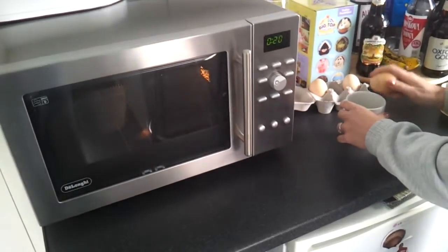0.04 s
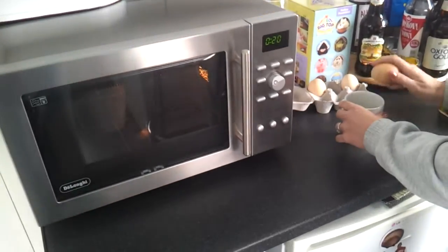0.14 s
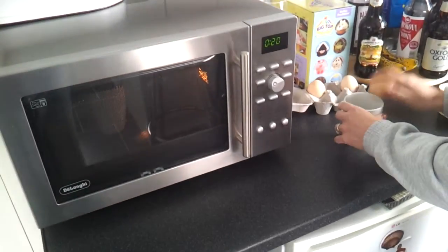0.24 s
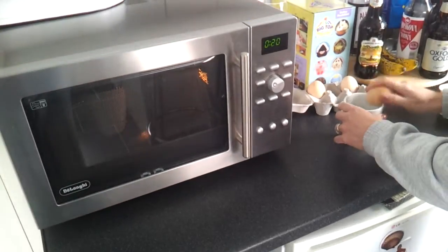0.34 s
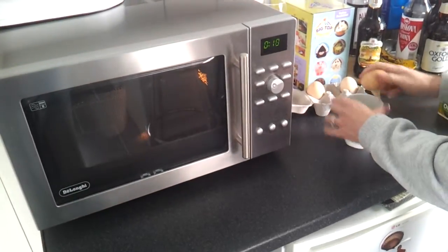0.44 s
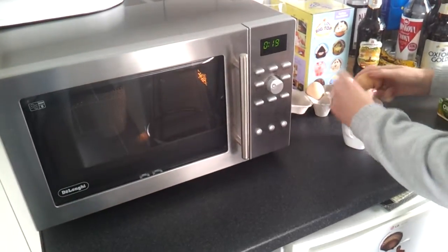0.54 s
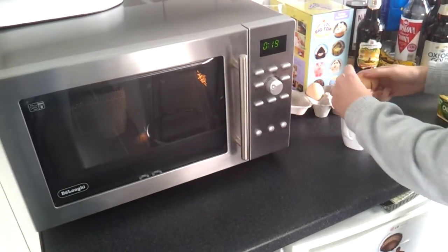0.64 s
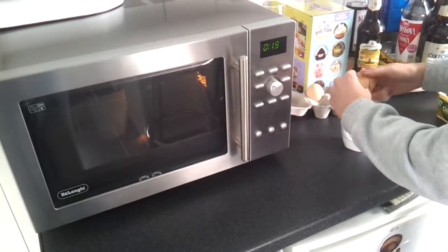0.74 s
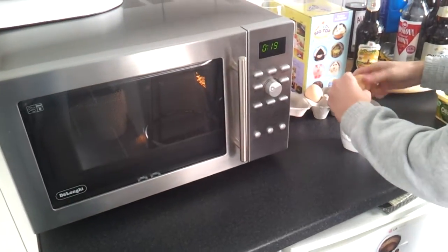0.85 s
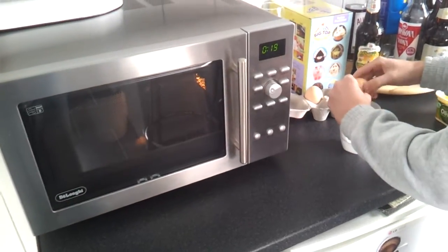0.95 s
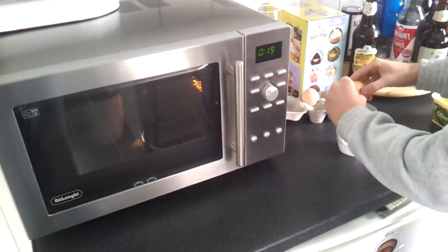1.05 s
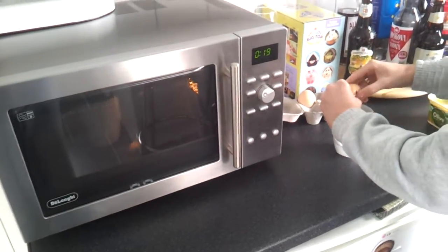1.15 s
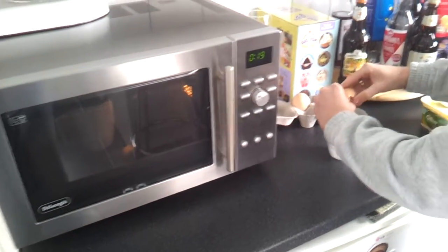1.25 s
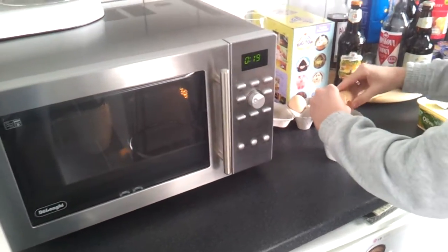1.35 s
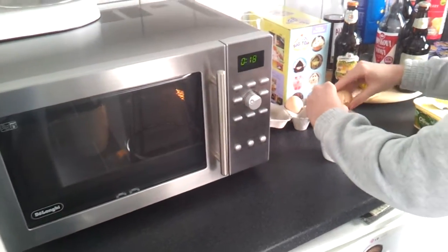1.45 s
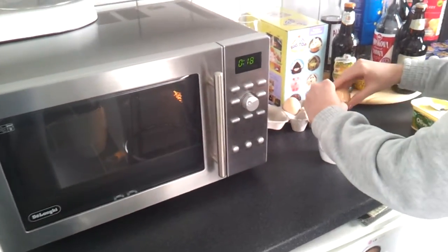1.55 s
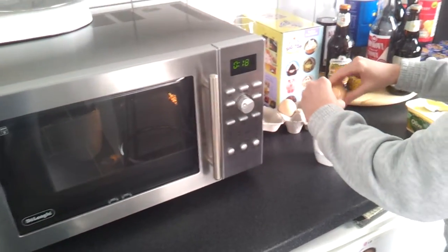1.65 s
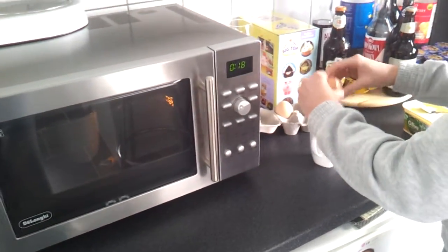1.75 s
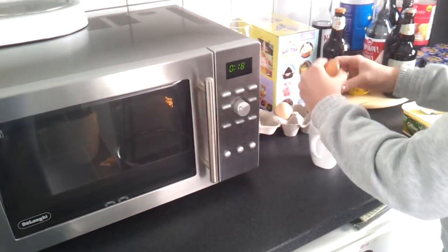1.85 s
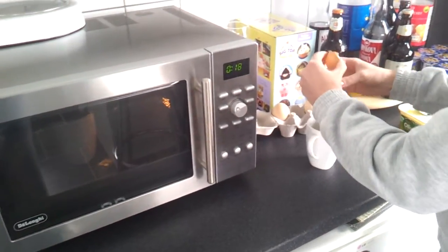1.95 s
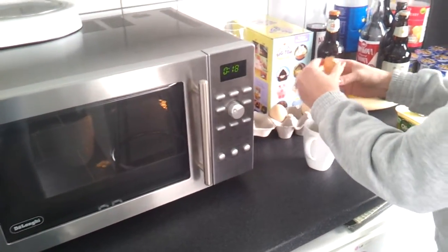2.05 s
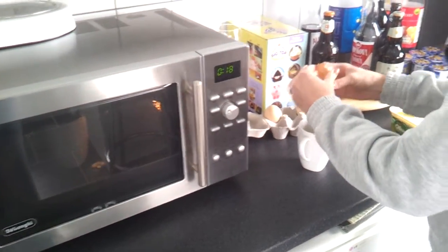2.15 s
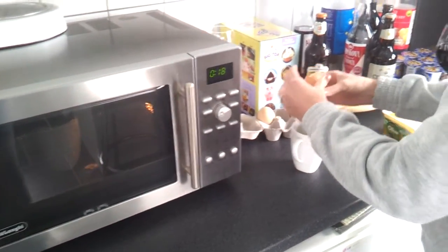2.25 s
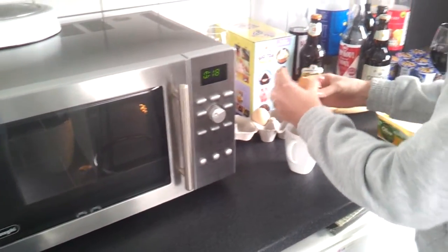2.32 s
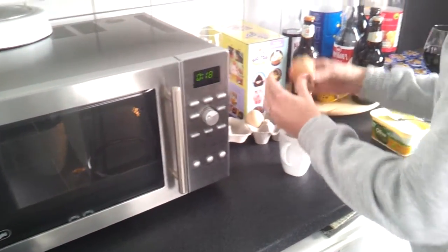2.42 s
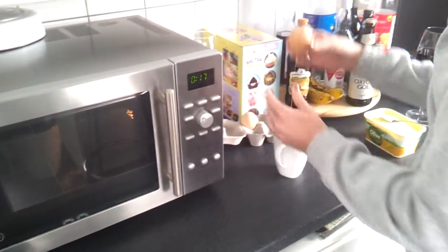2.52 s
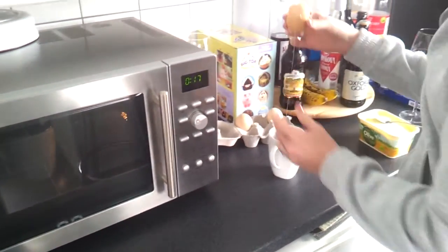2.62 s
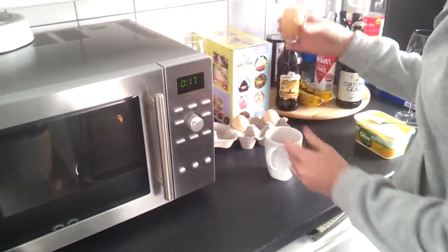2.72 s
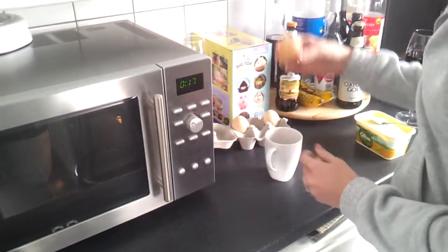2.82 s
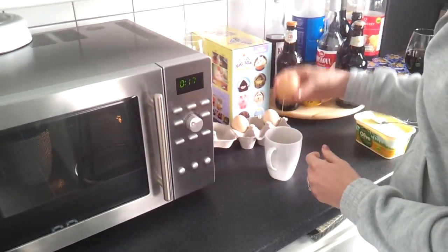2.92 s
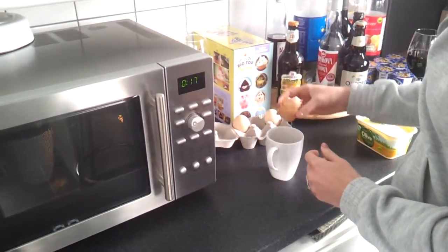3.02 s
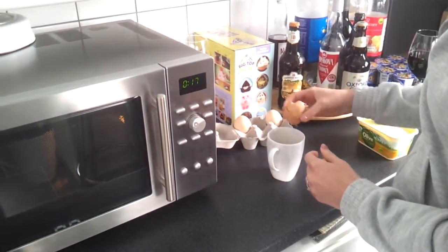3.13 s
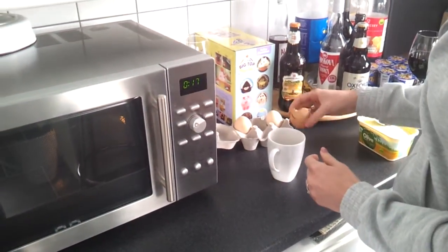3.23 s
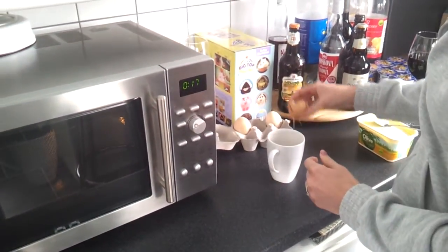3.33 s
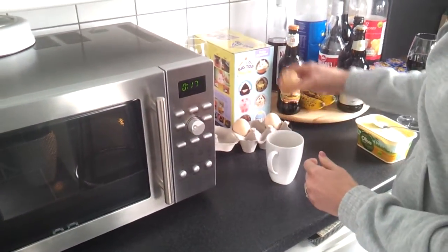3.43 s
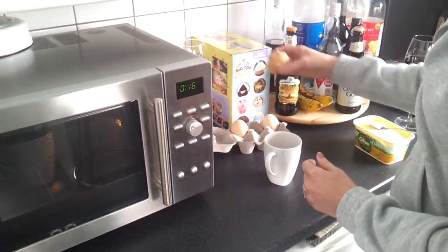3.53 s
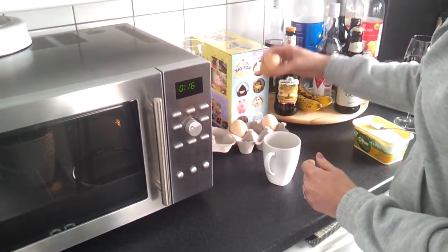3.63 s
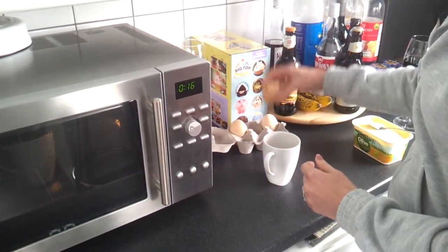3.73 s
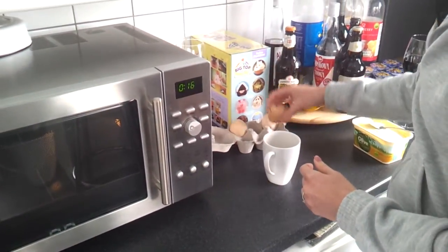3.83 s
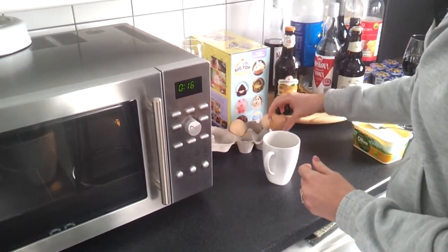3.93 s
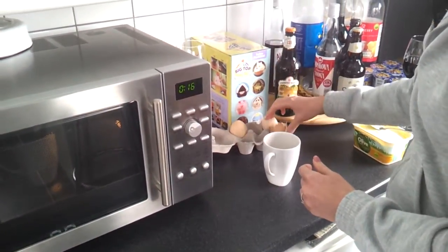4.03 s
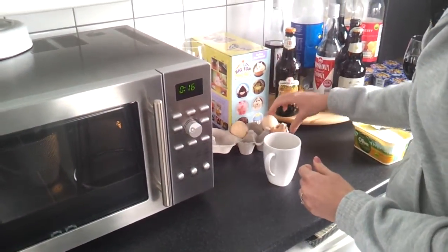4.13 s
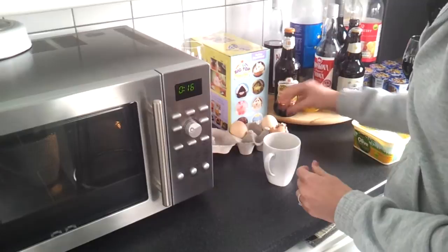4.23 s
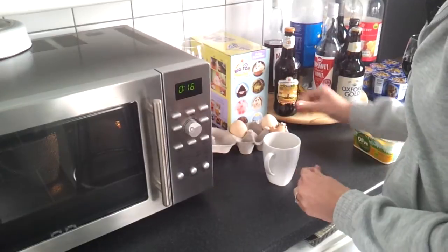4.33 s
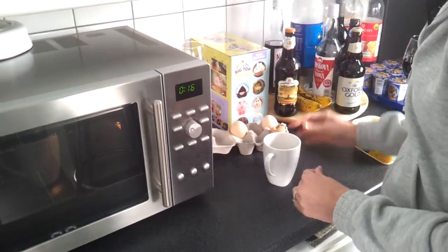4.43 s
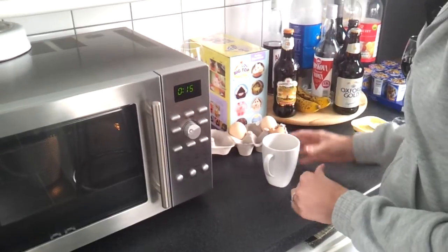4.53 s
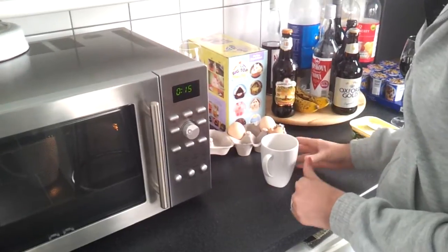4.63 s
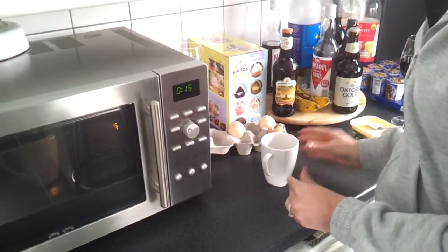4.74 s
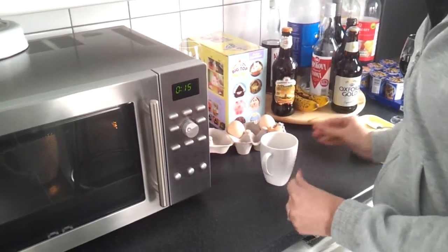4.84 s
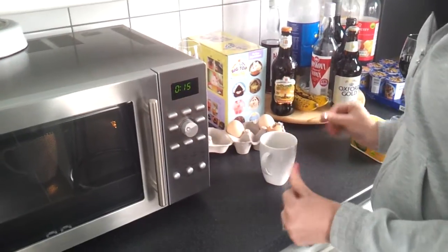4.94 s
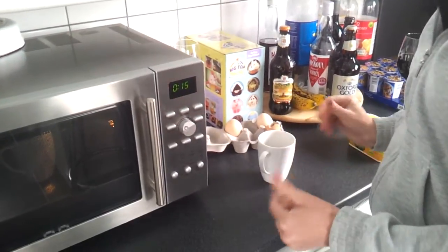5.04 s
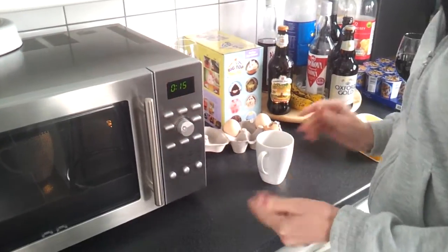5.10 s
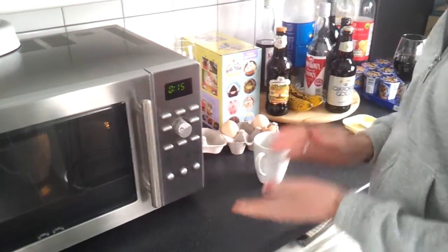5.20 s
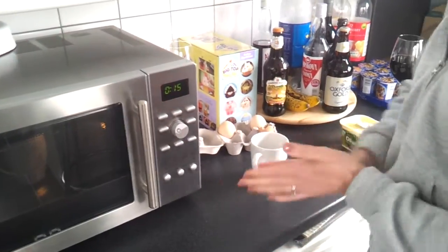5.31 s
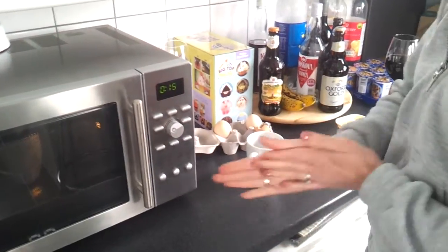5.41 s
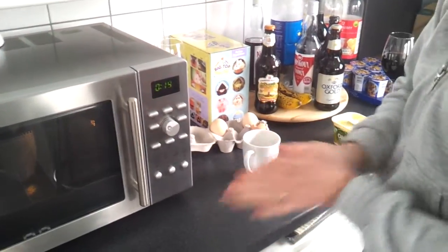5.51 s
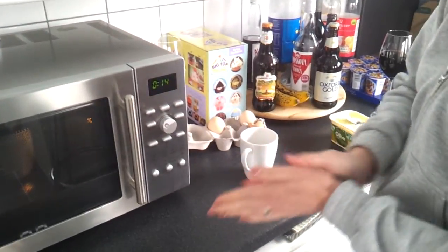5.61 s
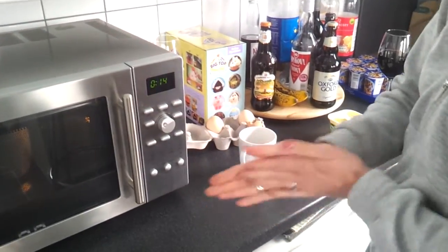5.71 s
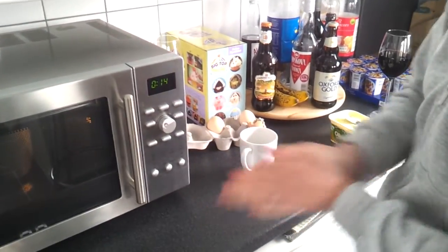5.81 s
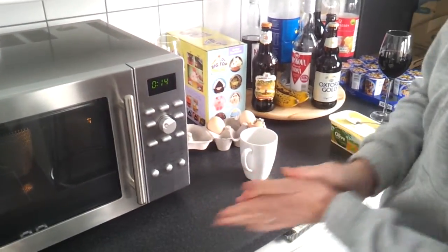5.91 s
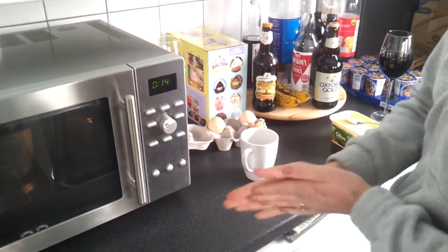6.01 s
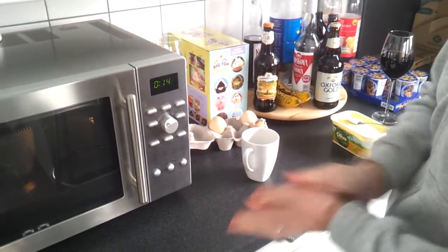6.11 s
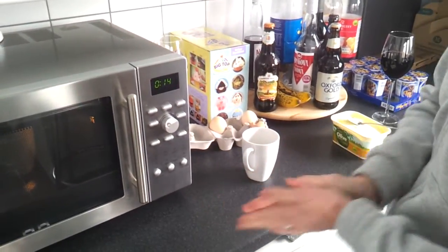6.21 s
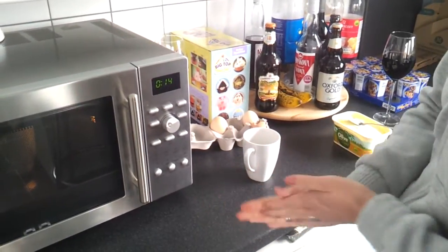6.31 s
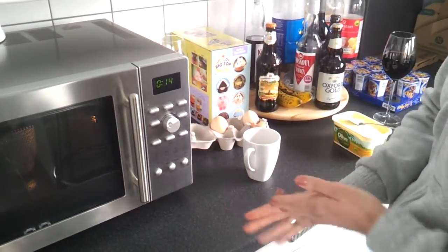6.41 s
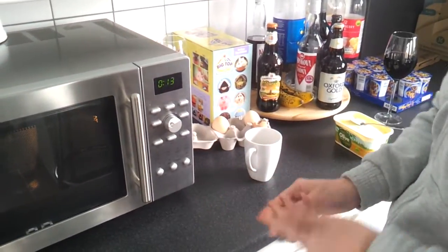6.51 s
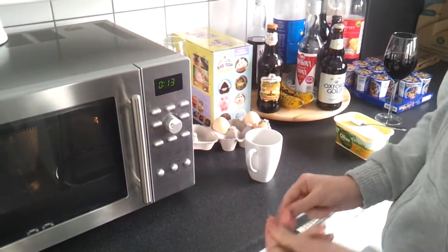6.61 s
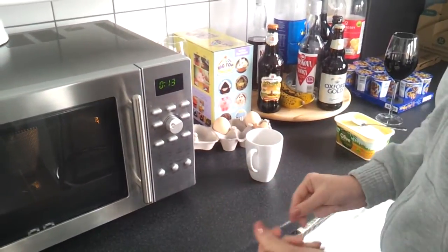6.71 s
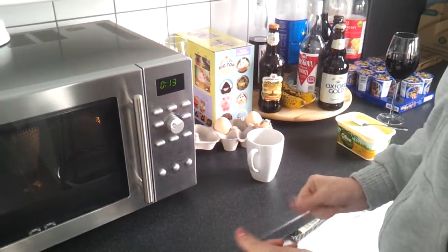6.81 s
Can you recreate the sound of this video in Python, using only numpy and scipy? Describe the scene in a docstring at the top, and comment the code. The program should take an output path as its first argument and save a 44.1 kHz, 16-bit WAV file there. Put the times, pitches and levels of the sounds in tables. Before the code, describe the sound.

Three quick knocks crack an egg beside a humming, blowing microwave oven, and a china cup rings faintly. Small crackles follow as the shell comes apart, with a second slight clink. After a few faint ticks the shell lands in its carton, then palms brush to and fro. The oven drones steadily the whole time, heard from beside the worktop in a small kitchen with a short echo.

```python
"""A small tiled kitchen, the microphone by the worktop. A microwave oven runs throughout: its fan drones
and blows, its transformer hums. Beside it an egg is knocked three times to crack it. The shell crackles as
it is pulled open over a china cup, which clinks twice, and is dropped into the carton; then two hands are
rubbed together. Tiles and cupboards close by ring after the handwork."""
import sys
import numpy as np
from scipy import signal
from scipy.fft import rfft, irfft, next_fast_len
from scipy.io import wavfile
from scipy.ndimage import uniform_filter1d

SR = 44100
rng = np.random.default_rng(int(sys.argv[2]) if len(sys.argv) > 2 else 0)


def file_out(sig):
    """Save sig as 16-bit WAV at sys.argv[1]."""
    # one column per channel
    cols = np.atleast_2d(sig).T
    # limit, then scale
    lim = np.clip(cols, -1, 1)
    pcm = np.round(lim * 32767).astype(np.int16)
    wavfile.write(sys.argv[1], SR, pcm)


N = 302526
TIME = np.arange(N) / SR
MAINS_HZ, TOP_HZ = 50, 8700
WANDER_PER_S = 1.488  # pace of the slow drifts in fan speed and hum level


def amp(db):
    """Decibels to gain."""
    return 10 ** (np.asarray(db) / 20)


def at_pitch(points, hz):
    """Read (f/Hz, value) points on a log-frequency axis."""
    f, value = np.transpose(points)
    return np.interp(np.log(np.maximum(hz, 1)), np.log(f), value)


def colour(x, points):
    """Causal filter with the given (f/Hz, level/dB) response."""
    n = next_fast_len(2 * len(x), True) // 2 * 2
    gain = amp(at_pitch(points, np.fft.rfftfreq(n, 1 / SR)))
    cepstrum = irfft(np.log(gain))
    cepstrum[1:n // 2] *= 2  # folded for minimum phase
    cepstrum[n // 2 + 1:] = 0
    return irfft(rfft(x, n) * np.exp(rfft(cepstrum)), n)[:len(x)]


def band(x, low_hz, high_hz, order=2):
    """Band-pass between two edges."""
    return signal.sosfilt(signal.butter(order, [low_hz, high_hz], "band", fs=SR, output="sos"), x)


def unit(x):
    """Scale to rms 1."""
    return x / np.sqrt(np.mean(x ** 2))


def walk(rate):
    """A smooth random drift of rms 1, with about `rate` new values a second."""
    hold = max(int(SR / rate), 1)
    steps = rng.standard_normal(N)[np.arange(N) // hold]
    return unit(uniform_filter1d(steps, hold))


def tone(phase, db):
    """A sine of the given rms level that starts anywhere in its cycle."""
    return np.sqrt(2) * amp(db) * np.sin(phase + 2 * np.pi * rng.random())


def fade(t60, size=SR // 4):
    """An exponential decay that loses 60 dB in t60 seconds."""
    return np.exp(-np.log(1000) * TIME[:size] / t60)


def rise(seconds, size=SR // 4):
    """An onset that climbs towards 1 with the given time constant."""
    return 1 - np.exp(-TIME[:size] / seconds)


def ring(modes, size=SR // 4):
    """A struck body's fading modes, with a peak of 1."""
    y = sum(amp(db) * fade(t60, size) * np.sin(2 * np.pi * hz * TIME[:size]) for hz, db, t60 in modes)
    return y / np.abs(y).max()


def burst(t60):
    """A crunch that starts at once and fades, even in spectrum so that it has no pitch."""
    spectrum = rfft(fade(t60) * rng.standard_normal(SR // 4))
    even = irfft(spectrum / np.abs(spectrum), SR // 4) * fade(2 * t60)
    return even * np.linalg.norm(fade(t60)) / np.linalg.norm(even)


def add(out, s, sound):
    """Mix a sound in at time s."""
    i = int(s * SR)
    out[i:i + len(sound)] += sound[:N - i]


# the fan's tones: multiple of the blade rate, level/dB, flutter/ratio to the steady part
BLADE_TONES = [(1, -47, 0.045), (2, -46.5, 0.094), (3, -59, 0.11), (5, -55, 1.4), (6, -65, .6),
               (7, -67.5, 0.83)]
def fan_drone(blade_phase, flutter_per_s=14):
    """The passing blades make harmonics; eddies push each about in strength and phase."""
    drone = 0
    for harmonic, db, flutter in BLADE_TONES:
        eddies = (walk(flutter_per_s) + 1j * walk(flutter_per_s)) / np.sqrt(2)
        wobble = (1 + flutter * eddies) / np.hypot(1, flutter)
        drone += np.abs(wobble) * tone(harmonic * blade_phase + np.angle(wobble), db)
    return drone


# the transformer's tones: multiple of the mains frequency, level/dB
HUM_TONES = [(2, -63.5), (4, -51.5), (6, -64.5), (8, -76), (12, -59), (14, -59.5)]
def transformer_hum(mains_phase):
    """The transformer hums on even harmonics of the mains."""
    return sum(tone(harmonic * mains_phase, db) for harmonic, db in HUM_TONES)


def motor_tones(shaft_phase, mains_phase):
    """The rotor modulates the magnetic pull: tones at the shaft rate and that far above two hum lines."""
    return sum(tone(k * mains_phase + shaft_phase, db) for k, db in [(0, -70), (4, -59), (2, -65)])


# the oven's whistles: f/Hz, level/dB
WHISTLES = [(6170, -70.5), (6540, -74.5), (6752, -73.5)]
def oven_whistles(trim_db=-1):
    """Faint high tones, each wavering in phase."""
    return sum(tone(2 * np.pi * hz * TIME + walk(7.6), db + trim_db) for hz, db in WHISTLES)


# spectrum of the air at the vents: f/Hz, level/dB per Hz
VENT_SPECTRUM = [(25, -93.5), (70, -88.5), (105, -75), (140, -74), (450, -71.5), (690, -72.5), (890, -74),
                 (980, -78.5), (1250, -78.5), (1680, -77), (1950, -81.5), (2700, -86), (4300, -87.5),
                 (6700, -89.5)]
def vent_air(trim_db=-1.24, swirl_db=0.31):
    """Air rushes through the vents, its level swaying slightly as it swirls."""
    white = rng.standard_normal(N) * np.sqrt(SR / 2)  # unit power per Hz
    return colour(white, VENT_SPECTRUM) * amp(trim_db + swirl_db * walk(8.3))


def oven(blade_hz=168.93, blades=4, speed_wander=0.00152, drone_db_per_s=0.31, hum_swell_db=1.6):
    """The oven on the worktop: fan and motor share one drifting shaft, the mains holds its pitch."""
    blade_rate = blade_hz * (1 + speed_wander * walk(WANDER_PER_S))
    blade_phase = 2 * np.pi * np.cumsum(blade_rate) / SR
    mains_phase = 2 * np.pi * MAINS_HZ * TIME
    drone = fan_drone(blade_phase)
    hum = transformer_hum(mains_phase)
    steady = motor_tones(blade_phase / blades, mains_phase) + oven_whistles() + vent_air()
    # the microphone moves slowly through the oven's sound: the drone grows, the hum swells and sinks
    drone *= amp(0.27 + drone_db_per_s * TIME)
    hum *= amp(-0.2 + hum_swell_db * walk(WANDER_PER_S))
    return drone + hum + steady


# spectrum of a crack in eggshell: f/Hz, level/dB
CRACK_SPECTRUM = [(300, -13.5), (1200, -13.5), (2000, -9.5), (2800, -5.5), (3600, -11), (4500, -2),
                  (5600, 0), (6800, -2.5), (8000, 4)]
# shell snaps, and at 1.58 s a short clink of the china cup near 2.6 kHz:
# t/s, level/dB, resonance f/Hz, relative resonance level/dB
SNAPS_AND_CLINK = [(.334, -12.5, 4800, -4.5), (0.3371, -11.5, 2900, -6), (0.9492, -33, 5630, -2),
                   (0.997, -36.5, 1640, 12), (1.066, -28, 3400, -9), (1.08, -30.5, 2250, 1),
                   (1.137, -36.5, 4300, 0), (1.226, -33, 5740, -14), (1.246, -39, 1640, 12.5),
                   (1.5137, -35, 4260, 9.5), (1.581, -48.5, 2570, 19), (2.12, -43, 5560, 4),
                   (2.3, -42, 5970, -4), (3.3486, -44, 5230, 0), (3.6913, -44, 5500, -2),
                   (4.0663, -36, 6000, -7)]
def snaps_and_clink(click_db=5.5, resonance_db=7, width=1.12, t60=0.015, run_on_s=0.0125, run_on_db=-12):
    """The shell cracks in two quick steps and a fragment resonates; in the clink it is the cup."""
    out = np.zeros(N)
    for s, db, hz, ring_db in SNAPS_AND_CLINK:
        for late, step_db in [(0, 0), (run_on_s, run_on_db)]:
            click = amp(click_db) * colour(burst(t60), CRACK_SPECTRUM)
            resonance = amp(resonance_db + ring_db) * band(burst(t60), hz / width, hz * width)
            # every piece faces another way, so each wakes its own reflections
            add(out, s + late, amp(db + step_db) * kitchen(click + resonance, wet_db=1))
    return out


# the china cup's modes: f/Hz, level/dB, t60/s
CUP_MODES = [(2550, 0, .55), (2660, -3, 0.33), (4400, -5, 0.36), (7100, 6, 0.43)]
# the egg touching the rim: t/s, level/dB
CLINKS = [(0.334, -25.5), (1.58, -53)]
def cup_clinks():
    """The rim rings faintly, damped by the hand that holds the cup."""
    out = np.zeros(N)
    for s, db in CLINKS:
        add(out, s, amp(db) * ring(CUP_MODES, size=SR))
    return out


# modes of the worktop and crockery: f/Hz, level/dB, t60/s
WORKTOP_MODES = [(153, -29, 0.11), (235, -30, 0.13), (328.4, -7, 0.083), (474, -12, 0.11),
                 (640, -14.5, 0.063), (718, -5.5, 0.033), (808, -0.5, 0.029), (891, 5.5, 0.013),
                 (1038, -3.5, 0.025), (1282, -15, 0.032), (1440, -6, 0.026)]
# blows of the egg, some in close pairs: t/s, level/dB, treble edge f/Hz, gap to the first rebound/s
BLOWS = [(0.3354, -0.5, 2500, 0.0024), (0.4703, -5, 1200, 0.00624), (0.4926, -3.5, 1720, 0.0045),
         (0.8098, -6, 1600, .0061), (0.8364, -4.5, 1390, .0085)]
def egg_knocks(crunch_db=-15, crunch_t60=0.06, bass_hz=155, rebound_db=-11.5, gap_shrink=0.883):
    """Each blow and two ever weaker, quicker rebounds ring the worktop while the shell crunches."""
    out = np.zeros(N)
    worktop = ring(WORKTOP_MODES) * rise(seconds=0.00064)  # the yielding shell pushes gradually
    for s, db, bright_hz, gap in BLOWS:
        for bounce in range(3):
            contact = worktop + amp(crunch_db) * burst(crunch_t60)
            knock = band(contact, bass_hz, bright_hz, order=1)  # a softer contact dulls the upper modes
            add(out, s, amp(db + bounce * rebound_db) * knock)
            s += gap * gap_shrink ** bounce
    return band(out, bass_hz, high_hz=1750, order=4)


# shell and carton ringing together: f/Hz, level/dB, t60/s
CARTON_MODES = [(774, -7, 0.049), (1330, -7.5, 0.037), (1630, -3, 0.042), (1980, 7.5, 0.0094),
                (2830, -5, 0.01), (5000, -1.5, 0.014), (6540, -1, 0.0076)]
# the empty shell meeting the carton: t/s, level/dB
LANDINGS = [(4.112, -35), (4.1195, -15), (4.124, -27)]
def shell_drop(body_db=1, scrape_db=-5.5, scrape_t60=0.033):
    """The hollow shell touches, lands and rocks in the carton, with a short scrape each time."""
    out = np.zeros(N)
    body = amp(body_db) * ring(CARTON_MODES)
    for s, db in LANDINGS:
        scrape = amp(scrape_db) * burst(scrape_t60)
        add(out, s, amp(db) * (body + scrape))
    return band(out, low_hz=600, high_hz=TOP_HZ)


# spectrum of dry skin sliding: f/Hz, level/dB
SKIN_SPECTRUM = [(500, -30), (2000, -24), (3200, -15.5), (4500, -7), (5600, -2.5), (6600, -1.5), (8000, -1)]
# strokes of palm over palm, to and fro: t/s at the fastest, level/dB, attack/s, release/s
STROKES = [(5.43, -40, 0.076, 0.043), (5.578, -30.5, 0.036, .024), (5.711, -27, 0.0095, 0.034),
           (5.885, -34, 0.04, 0.039), (6.015, -26.5, .011, 0.014), (6.166, -32.5, 0.044, .02),
           (6.302, -28.5, 0.023, 0.029)]
def hand_rub(meet_s=5.3395, pat_db=-22.5, grain_db=3, hiss_db=2):
    """The palms meet with a pat; skin ridges then catch and slip, a grainy hiss swelling each stroke."""
    slips = rng.standard_normal(N) * amp(grain_db * walk(400))
    hiss = amp(hiss_db) * unit(colour(slips, SKIN_SPECTRUM))
    effort = sum(amp(db) * np.exp(-np.maximum((s - TIME) / attack, (TIME - s) / release))
                 for s, db, attack, release in STROKES)
    out = hiss * effort * (TIME > meet_s)
    pat = burst(t60=0.032) * rise(seconds=0.0017)
    add(out, meet_s, amp(pat_db) * band(pat, low_hz=1700, high_hz=TOP_HZ))
    return out


# the kitchen's reverberation: f/Hz, t60/s
ROOM_DECAY = [(150, 0.41), (500, 0.45), (1400, 0.33), (3700, 0.44), (8000, 0.33)]
def kitchen(x, wet_db, build_s=0.0012):
    """The direct sound at the microphone, and a dense tail from the tiles and cupboards close by."""
    size = SR // 2
    hz = np.fft.rfftfreq(size, 1 / SR)
    centres, t60s = np.transpose(ROOM_DECAY)
    noise = rfft(rng.standard_normal(size))
    tail = 0
    for t60, one_band in zip(t60s, np.eye(len(centres))):
        weight = at_pitch(np.c_[centres, one_band], hz)  # overlapping bands, each with its own decay
        tail += irfft(noise * weight, size) * fade(t60, size)
    tail *= rise(build_s, size)
    out = amp(wet_db) * signal.fftconvolve(x, tail / np.linalg.norm(tail))
    out[:len(x)] += x
    return out[:N]


def scene():
    """At the worktop, in mono: the running oven and the handwork beside it."""
    knocks = kitchen(egg_knocks(), wet_db=3.5)
    drop = kitchen(shell_drop(), wet_db=-1.5)
    hands = kitchen(hand_rub(), wet_db=-3)
    handwork = snaps_and_clink() + cup_clinks() + knocks + drop + hands
    return (oven() + handwork)[None]


# the microphone's treble response: f/Hz, level/dB
MIC_RESPONSE = [(6700, 1.5), (7200, -7), (7600, -16.5), (8000, -31), (8800, -31.5)]
def record(dry):
    """One small microphone whose treble falls away above 7 kHz."""
    treble_cut = signal.ellip(8, .2, 70, TOP_HZ, fs=SR, output="sos")
    return signal.sosfilt(treble_cut, colour(dry[0], MIC_RESPONSE))[None]


dry = scene()
out = record(dry)
file_out(out)
```